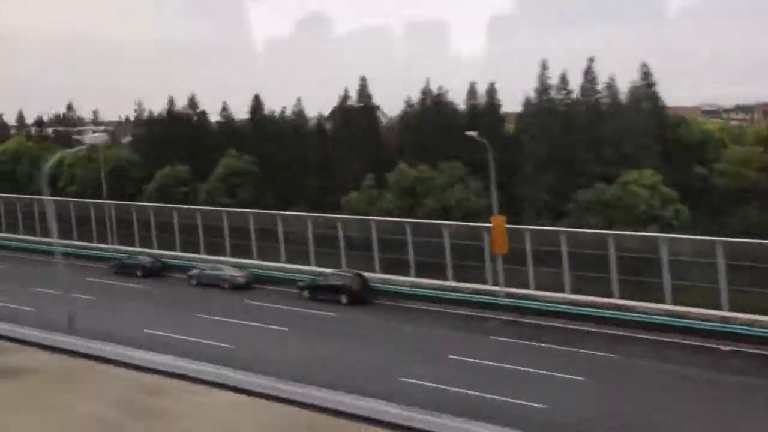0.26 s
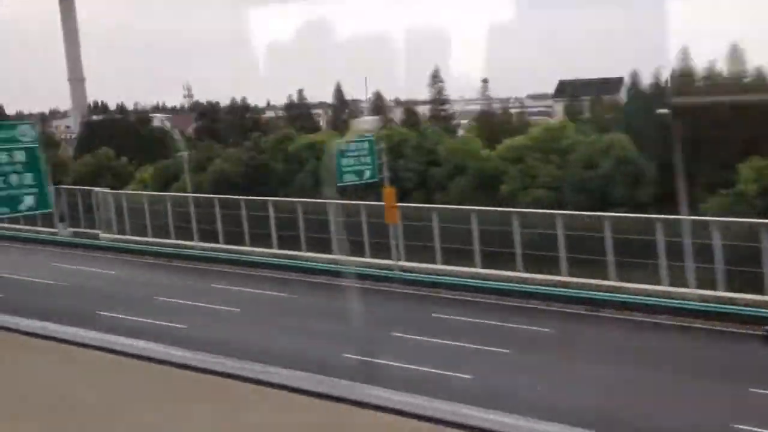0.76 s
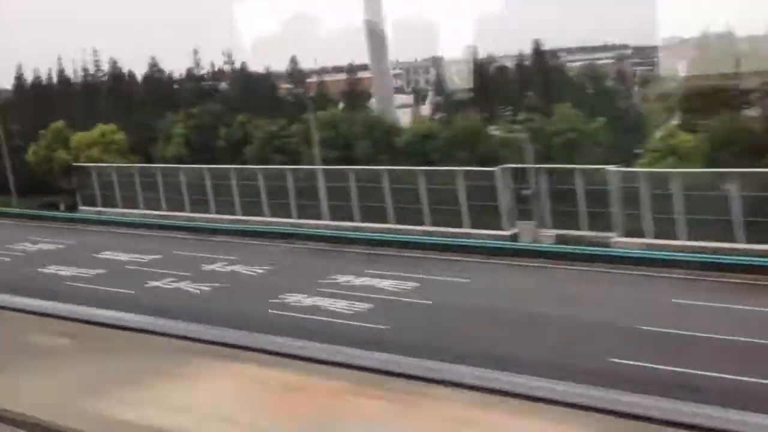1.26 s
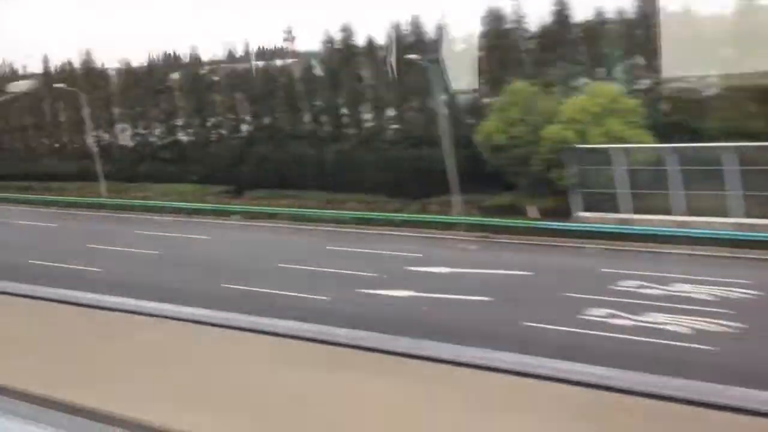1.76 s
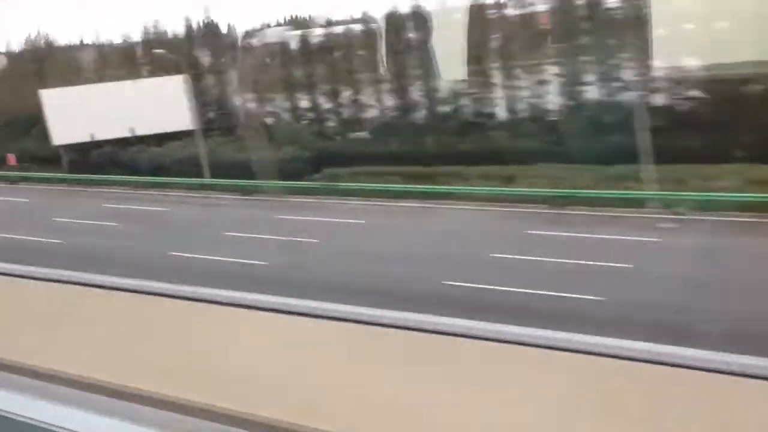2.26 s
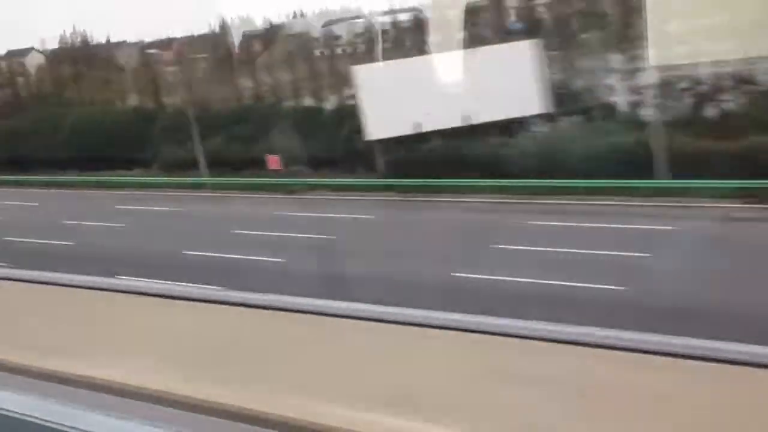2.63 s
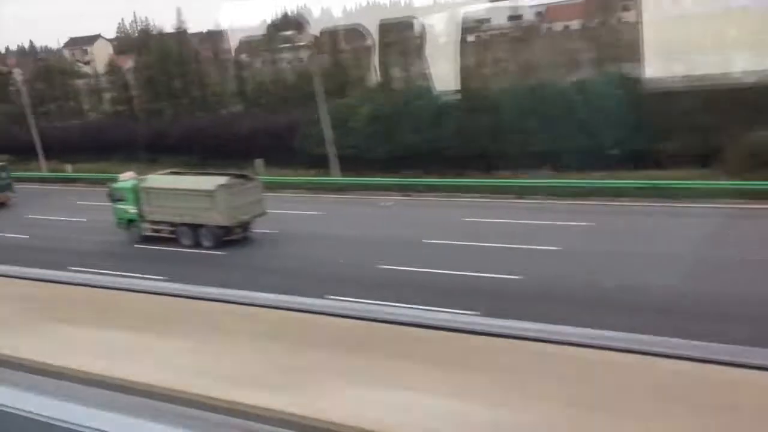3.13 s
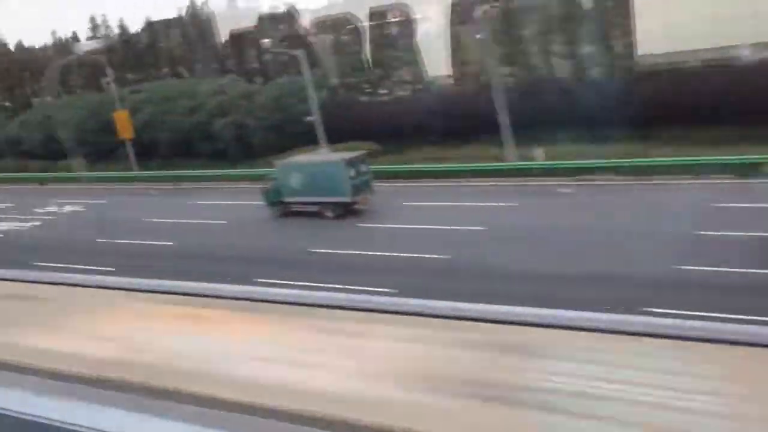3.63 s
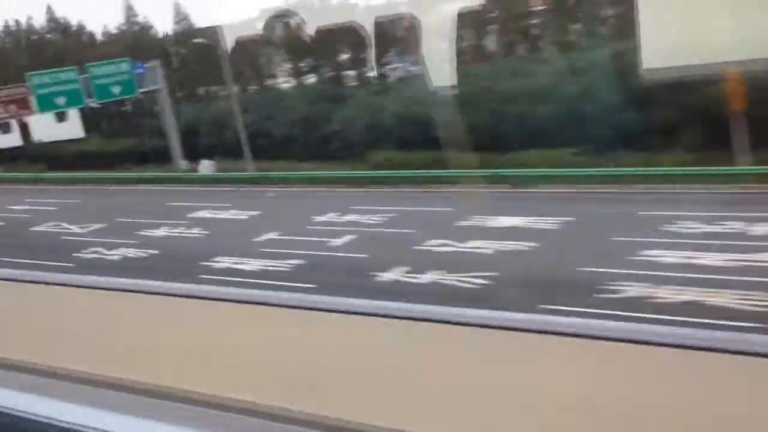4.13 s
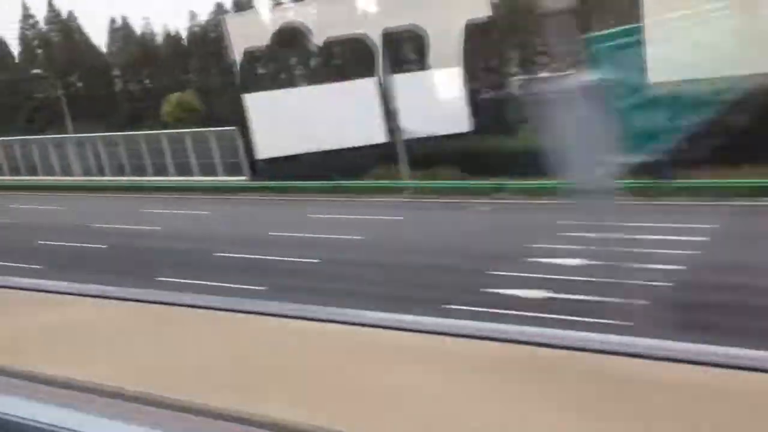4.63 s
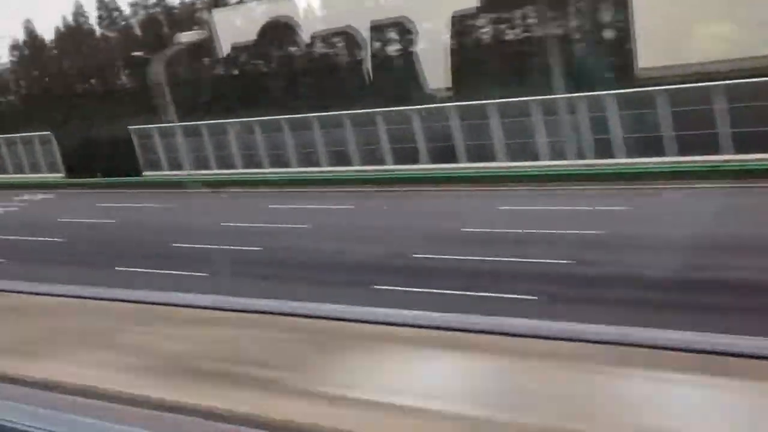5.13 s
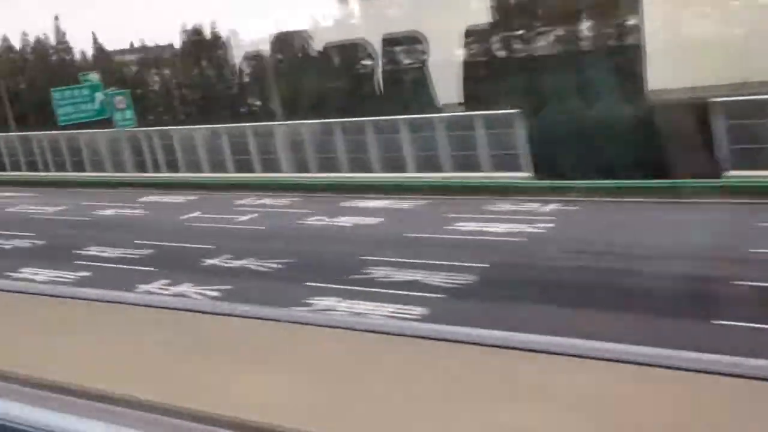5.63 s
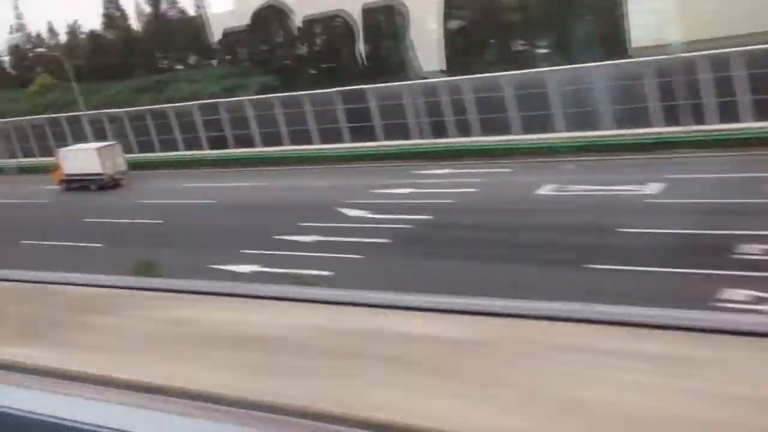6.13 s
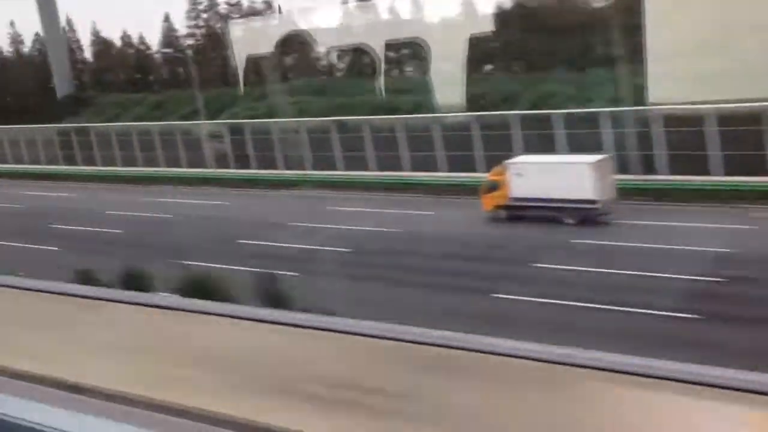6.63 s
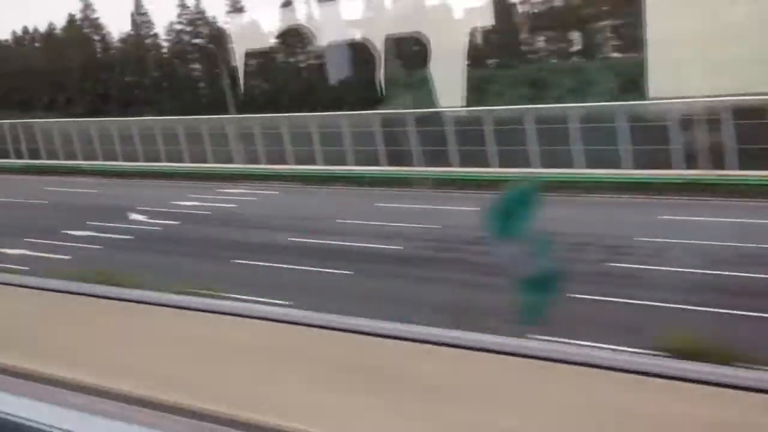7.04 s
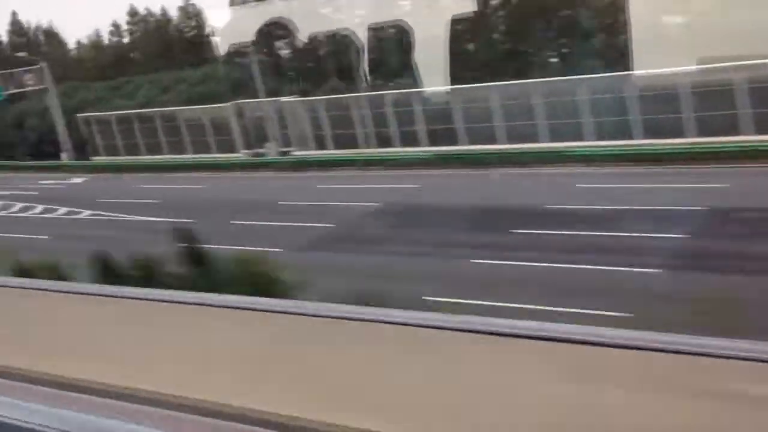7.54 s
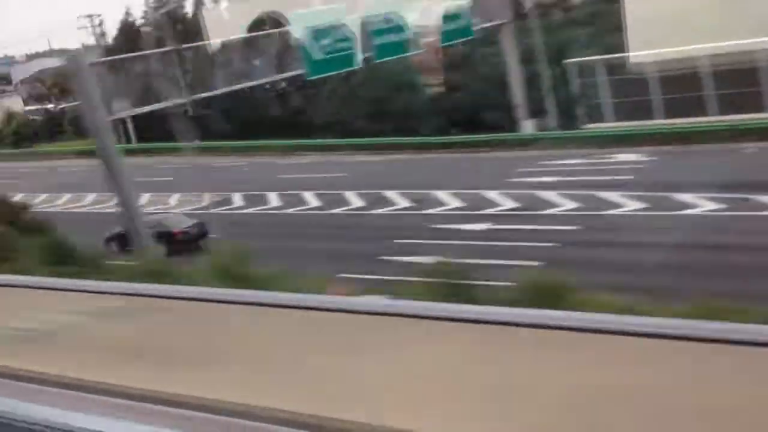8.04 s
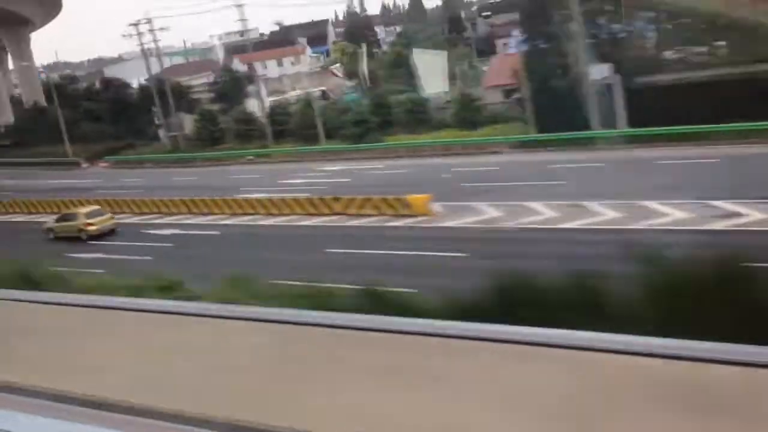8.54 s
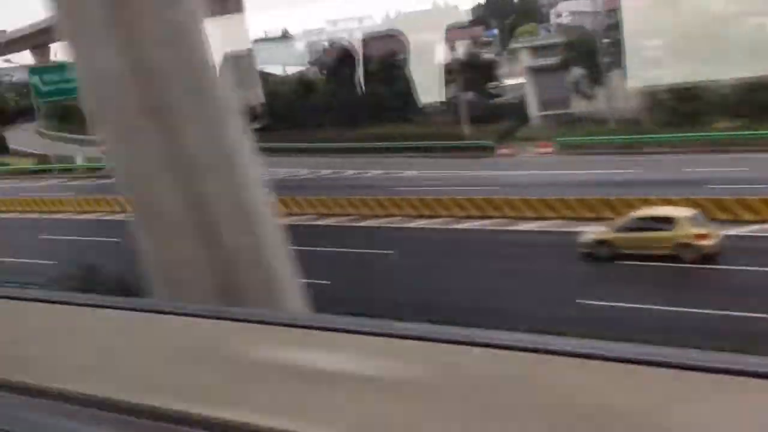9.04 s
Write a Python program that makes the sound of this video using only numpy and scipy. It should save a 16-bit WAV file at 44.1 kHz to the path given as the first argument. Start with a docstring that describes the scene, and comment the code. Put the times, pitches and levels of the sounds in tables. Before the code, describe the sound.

Heard beside a train window, a heavy bass drone shudders unevenly at steady speed, with faint motor hum, muted air hiss and tiny trim ticks.

```python
"""A deep throbbing rumble inside a maglev train at steady speed, heard beside a window.
The guideway shakes the car body: shaped noise throbs at random, with dull thumps and brief lulls.
Filtered noise makes the drone of the walls and the rush of air; one soft band of hiss slides in pitch.
Stator poles and slots pass under the magnets and whine faintly: wavering tones tied to the pole rate.
Trim ticks in short noise bursts; there are faint tonal blips, and soft swishes from sprays of clicks."""
import sys
import numpy as np
from scipy import signal
from scipy.fft import rfft, irfft
from scipy.io import wavfile
from scipy.ndimage import uniform_filter1d

SR = 44100
rng = np.random.default_rng(int(sys.argv[2]) if len(sys.argv) > 2 else 0)


def master(y):
    """Save y as 16-bit WAV."""
    cut = np.clip(np.atleast_2d(y).T, -1, 1)
    pcm = np.round(cut * 32767)  # scale
    wavfile.write(sys.argv[1], SR, pcm.astype(np.int16))


N = 409688
T = np.arange(N) / SR  # time of every sample in seconds


def gain_of(db):
    """Turns dB into a plain multiplier."""
    return 10 ** (np.asarray(db) / 20)


def evened(x):
    """Scales a signal to an average strength (rms) of one."""
    return x / np.sqrt(np.mean(abs(x) ** 2) + 1e-20)


def level(rows, column):
    """Gain over time from one dB column of a curve."""
    rows = np.asarray(rows)
    return gain_of(np.interp(T, rows[:, 0], rows[:, column]))


def add(mix, start_s, sound):
    """Mixes a sound in at a time, cut off where the scene ends."""
    part = mix[round(start_s * SR):][:len(sound)]
    part += sound[:len(part)]


def tint(spectrum, peaks):
    """Level in dB at every frequency: a smooth slope with a few resonances."""
    f = np.fft.rfftfreq(N, 1 / SR)
    hz, db = np.transpose(spectrum)
    colour = np.interp(np.log(f + 1), np.log(hz), db)
    for centre, width, lift in peaks:
        colour = colour + lift / (1 + (2 * (f - centre) / width) ** 2)
    return colour


def noise(spectrum, peaks=(), ripple_db=0):
    """Unit noise with the given colour, a few resonances and the fine ripple of many panel modes."""
    modes = np.arange(0, SR / 2, 16)
    # high modes overlap and even out
    ripple = rng.standard_normal(len(modes)) / (1 + (modes / 3500) ** 4)
    fine = ripple_db * np.interp(np.fft.rfftfreq(N, 1 / SR), modes, ripple)
    colour = tint(spectrum, peaks) + fine
    return evened(irfft(rfft(rng.standard_normal(N)) * gain_of(colour), N))


def wander(rate_hz):
    """Complex unit noise that changes at about the given rate."""
    points_per_s = 400
    hz = np.fft.fftfreq(4096, 1 / points_per_s)
    a, b = rng.standard_normal((2, len(hz)))
    z = np.fft.ifft((a + 1j * b) / (1 + (hz / rate_hz) ** 2))
    return evened(np.interp(T, np.arange(len(z)) / points_per_s, z))


def steadied(x, span_s):
    """Takes the slow chance swells out of a noise and keeps its fast flutter."""
    size = max(int(span_s * SR), 2)
    power = uniform_filter1d(uniform_filter1d(x ** 2, size), size)
    return x / np.sqrt(power + 1e-9)


# Soft swishes, perhaps cloth, and one longer band of hiss near 4 kHz. Each row: start in seconds,
# length in seconds, level in dB before the sound swells and fades, centre in Hz.
SWISHES = [(.3, 0.68, -70.5, 4000), (1.448, 0.73, -80, 8000), (3.155, 0.09, -76, 9000),
           (3.964, 0.07, -63, 4730), (5.106, 0.15, -72, 7000), (6.055, .11, -64, 4780),
           (6.26, .17, -72, 6400), (6.849, .05, -59, 4170), (6.878, .1, -63, 4300), (6.85, .13, -75, 8400),
           (6.9, 0.28, -68, 6700), (8.09, 0.12, -66, 5400), (8.115, 0.075, -71, 9200),
           (9.16, 0.078, -71, 7500)]
# Colour of the tiny clicks. Each row: frequency in Hz, relative level in dB.
CLICK = [(1000, -22), (3000, 10.5), (5000, 5.5), (7500, -5.5), (10000, -4), (15000, -13)]
# Resonances of the clicks. Each row: frequency in Hz, width in Hz, lift in dB.
CLICK_PEAKS = [(4000, 500, 4.5), (6350, 350, 4), (6780, 250, -2.5), (7300, 400, 4.5), (7850, 300, -3),
               (8450, 600, 5), (9600, 400, 3.5)]
# how often the clicks come, and how much they differ
CLICKS_PER_S, CLICK_DB = 700, 4.5


def swishes():
    """Sprays of tiny clicks, like fibres catching, filtered around a centre pitch that differs by row."""
    clicks = (rng.random(N) < CLICKS_PER_S / SR) * rng.choice([-1, 1], N)
    clicks = clicks * gain_of(CLICK_DB * np.minimum(rng.exponential(1, N), 3))
    spray = irfft(rfft(clicks) * gain_of(tint(CLICK, CLICK_PEAKS)), N)
    out = np.zeros(N)
    for start_s, length_s, db, hz in SWISHES:
        size = int(length_s * SR)
        raw = np.roll(spray, -round(start_s * SR))[:size]
        peak = signal.iirpeak(hz, 1.9, fs=SR)
        swish = signal.lfilter(*peak, signal.lfilter(*peak, raw))
        add(out, start_s, gain_of(db) * evened(swish + 0.2 * raw) * np.hanning(size))
    return out


# Brief faint tonal blips, each at its own pitch. Each row: start in seconds, length in seconds,
# level in dB before the blip swells and fades, pitch in Hz.
BLIPS = [(0.245, 0.092, -46.5, 640), (4.078, 0.1, -47, 600), (6.506, .1, -61.5, 1590),
         (6.61, 0.1, -51, 1070)]


def blips():
    """Brief faint tones that waver at random, swell and fade."""
    out = np.zeros(N)
    waver = 1 + .5 * wander(rate_hz=25)
    for start_s, length_s, db, hz in BLIPS:
        size = int(length_s * SR)
        turn = np.exp(2j * np.pi * hz * T[:size])
        blip = (waver[round(start_s * SR):][:size] * turn).real
        add(out, start_s, gain_of(db) * evened(blip) * np.hanning(size))
    return out


# Ticks of the trim. Each row: start in seconds, level in dB before a shared lift,
# time in seconds for the tail to fall by 60 dB.
TICKS = [(.193, -64, .06), (.337, -63, .05), (.543, -64, .09), (.852, -62, .08), (1.618, -63, .14),
         (1.718, -63, .1), (2.168, -63, .12), (2.317, -62, .14), (3.103, -60, .12), (4.439, -62, .06),
         (5.221, -62, .17), (5.315, -58, .13), (5.344, -65, .06), (5.908, -61, .09), (6.089, -61, .15),
         (6.117, -64, .08), (6.175, -67, .05), (6.867, -62, .08), (7.343, -62, .07), (8.127, -65, .08),
         (8.162, -64, .08), (9.195, -66, .09)]
# Colour of a tick. Each row: frequency in Hz, relative level in dB.
TICK = [(600, -22), (2000, -8.5), (4000, 5.5), (7000, -1), (11000, -11.5), (15000, -11.5)]
# the first snap falls by 60 dB in this time; the cabin's answer starts this far under it
CRACK_T60_S, TICK_TAIL_DB = .016, -6


def trim():
    """Small dry ticks, each a snap with a short tail in the padded cabin."""
    out, scatter = np.zeros(N), noise(TICK)
    t = T[:SR // 4]
    for start_s, db, t60_s in TICKS:
        pick = rng.integers(N - len(t))
        snap = gain_of(-60 * t / CRACK_T60_S)
        tail = gain_of(TICK_TAIL_DB - 60 * t / t60_s)
        # 2.3 dB is the shared lift
        add(out, start_s, scatter[pick:pick + len(t)] * gain_of(db + 2.3) * (snap + tail))
    return out


POLE_HZ, PHASES = 80.935, 3  # rate of passing poles, and phases of the winding
# Hum of the stator: the multiples of the pole rate, then the level of each in dB.
HUM_ORDERS = [2, 5, 7, 9, 11, 14, 15, 17, 21, 27, 30, 36, 43, 48]
HUM_DB = [-43.5, -56, -63.5, -64, -67, -68.5, -67, -73, -80, -82, -82, -79.5, -80.5, -85.5]
# The hum at 8 times the pole rate. Each row: time in seconds, level in dB.
HUM_SWELL = [(0, -56.5), (1.2, -59.5), (1.8, -57), (2.3, -61), (4.1, -61.5), (6.5, -63.5), (9.29, -60.5)]
# Tones from the three-phase winding: multiples of a third of the pole rate, then the level of each in dB.
WINDING_ORDERS = [7, 8, 10, 13, 14, 16, 26, 28]
WINDING_DB = [-44, -51, -55, -58.5, -58, -62, -67, -68.5]
# Slot tones: the multiples of the pole rate, then a change in dB for the whole of each tone.
SLOT_ORDERS = [12, 18, 24]
SLOT_DB = [-1.5, 0.1, 0.5]
# The whines at 12, 18 and 24 times the pole rate.
# Each row: time in seconds, level in dB before the change for the whole tone.
WHINE_LOW = [(0.0, -58), (0.14, -50), (0.2, -66), (0.5, -46.5), (0.58, -60), (0.7, -50.0), (0.96, -49),
             (1.06, -52), (1.14, -48), (1.3, -56), (1.44, -47.5), (1.48, -61), (1.68, -53), (2.16, -62),
             (2.56, -57), (3.04, -71), (3.1, -49), (3.3, -61), (3.48, -51), (3.64, -65.0), (3.72, -56),
             (4.24, -64.0), (4.68, -48), (4.84, -64.0), (5.2, -53.0), (5.28, -66.5), (5.44, -53),
             (5.7, -69), (5.78, -53), (6.12, -64), (6.36, -55.0), (6.42, -61), (6.72, -73), (6.82, -54),
             (6.96, -65.0), (7.52, -62), (7.72, -64), (8.04, -50.5), (8.24, -62), (8.3, -55), (8.64, -66),
             (8.68, -53.5), (9.08, -66), (9.28, -53.0)]
WHINE_MID = [(0.0, -67), (0.56, -69), (0.66, -55), (0.88, -68.0), (0.98, -56), (1.06, -72), (1.5, -69.5),
             (1.56, -66), (1.92, -75), (2.24, -60.5), (2.38, -69.5), (2.72, -60.5), (3.08, -68.5),
             (3.16, -61), (3.42, -68), (3.48, -61), (5.18, -71), (5.3, -61), (5.5, -66), (5.68, -60),
             (5.76, -71), (6.22, -63), (6.28, -66), (6.9, -63.0), (7.2, -68), (7.28, -55), (7.36, -70),
             (7.56, -71), (7.6, -57.5), (8.12, -65.0), (8.2, -55), (8.3, -62), (9.02, -63), (9.28, -66)]
WHINE_HIGH = [(0.0, -71.0), (0.16, -72.0), (0.22, -61), (0.62, -66), (0.84, -59), (0.9, -71.5), (2.18, -75),
              (2.26, -61), (2.42, -69), (2.62, -65), (3.32, -74.5), (3.44, -73), (3.74, -64), (3.82, -73.5),
              (4.66, -75), (4.78, -56), (4.84, -76), (4.94, -62), (5.04, -73), (5.32, -62.0), (5.5, -67),
              (5.66, -61.0), (5.74, -73.5), (7.02, -73), (7.1, -63), (7.16, -80), (7.4, -63.5), (8.0, -75),
              (8.04, -65.0), (8.1, -73), (8.32, -64.0), (8.9, -73.5), (8.98, -64), (9.04, -77), (9.22, -78),
              (9.28, -62)]
# Smear of each slot tone. Each row: share of power smeared at first (0 to 1), the same later,
# width of the smear in Hz.
SLOT_SMEAR = [(.3, .72, 11), (.3, .1, 10), (.35, .3, 10)]
# When the smear starts to change and when it is done, in seconds.
SMEAR_CHANGE_S = [1.5, 2.3]
SLOT_STEADY = 0.65  # how far the smear of a slot tone is a waver of pitch and not of level


def motor():
    """Multiples of the pole rate; the many magnets beat against each other and smear the tones."""
    pole_hz = POLE_HZ + 0.049 * wander(rate_hz=0.67).real
    phase = 2 * np.pi * np.cumsum(pole_hz) / SR

    def tone(order, smear, width_hz, steady=0):
        """A unit tone: one pure part and one that wavers at random."""
        smear = np.clip(smear, 0, 1)
        beat = np.sqrt(1 - smear) + np.sqrt(smear) * wander(rate_hz=width_hz)
        beat = evened(beat / (abs(beat) + .1) ** steady)
        turn = np.exp(1j * (order * phase + 2 * np.pi * rng.random()))
        return np.sqrt(2) * (beat * turn).real

    out = level(HUM_SWELL, column=1) * tone(order=8, smear=0.54, width_hz=4.0)
    for order, db in zip(HUM_ORDERS, HUM_DB):
        out += gain_of(db) * tone(order, smear=0.55, width_hz=1.6)
    for order, db in zip(WINDING_ORDERS, WINDING_DB):
        out += gain_of(db) * tone(order / PHASES, smear=0.37, width_hz=1.6)
    whines = (WHINE_LOW, WHINE_MID, WHINE_HIGH)
    for order, curve, db, (first, later, width_hz) in zip(SLOT_ORDERS, whines, SLOT_DB, SLOT_SMEAR):
        smear = np.interp(T, SMEAR_CHANGE_S, (first, later))
        whine = tone(order, smear, width_hz, SLOT_STEADY)
        out += gain_of(db) * level(curve, column=1) * whine
    return out


# A narrow band of hiss that drifts and comes and goes.
# Each row: time in seconds, centre in Hz, level in dB before a shared cut.
HISS_BAND = [(0,3200,-73), (.9,3250,-64.5), (1.25,3370,-66), (1.6,3290,-67), (2,3140,-69.5), (2.9,3385,-70),
             (3.35,3460,-67), (3.6,3480,-67), (4.3,3480,-67.5), (5,3450,-68), (5.35,3330,-63),
             (5.601,3300,-67.5), (5.85,3480,-63), (6.15,3450,-68), (6.45,3510,-77), (6.95,3510,-80),
             (7.2,3400,-61), (7.6,3476,-66.5), (8.6,3475,-68.5), (9.29,3470,-67.5)]
HISS_WIDTH_HZ = 330


def hiss_band():
    """Air noise in one soft resonance that slides slowly up and down."""
    s, hz, _ = np.transpose(HISS_BAND)
    a, b = rng.standard_normal((2, N))
    narrow = signal.lfilter(*signal.butter(2, HISS_WIDTH_HZ / 2, fs=SR), a + 1j * b)
    # turning the slow noise moves it up to the sliding centre
    turn = np.exp(2j * np.pi * np.cumsum(np.interp(T, s, hz)) / SR)
    return gain_of(-2.3) * evened((narrow * turn).real) * level(HISS_BAND, column=2)


EDDY_TOP_HZ = 4200  # well above this the eddies are too small to hear one by one, and the hiss is even
THREAD_DB = 1.3  # strength of the longer threads


def turbulent(x, patchy_db):
    """Eddies lift and drop narrow bands of a noise for a tenth of a second; threads last half a second."""
    hz, _, z = signal.stft(x, SR, nperseg=1024, noverlap=768)

    def patches(size, top_hz):
        """Random patches over time and pitch, fading out above a top frequency."""
        field = uniform_filter1d(rng.standard_normal(z.shape), size=3, axis=0)
        return evened(uniform_filter1d(field, size=size, axis=1)) / (1 + (hz[:, None] / top_hz) ** 4)

    eddies = patchy_db * patches(size=20, top_hz=EDDY_TOP_HZ)
    threads = THREAD_DB * patches(size=80, top_hz=8000)
    _, uneven = signal.istft(z * gain_of(eddies + threads), nperseg=1024, noverlap=768)
    return evened(uneven[:N])


# Brief changes of the rumble, mostly dips. Each row: time in seconds, change in dB of the floor's heave,
# change in dB of the panels' boom.
LULLS = [(.16, -6, -4), (.25, -3, -0.5), (.31, 6, -2), (.61, -5, -1.5), (1.05, -9, -1), (1.38, -5.5, -6.5),
         (1.72, -2, -4), (2.2, -3.5, -8.5), (2.32, -5, -4), (2.44, -18, -3), (2.77, -7, -13),
         (3.13, -7, -1.5), (3.32, -6, -2), (3.44, -6, -2.5), (3.8, -3, -1.5), (3.87, -4, -1.5),
         (4.1, -7, -5), (4.42, -2.5, -4.5), (5.07, -3, -6), (5.28, -7.5, 3.5), (5.73, -5, 1),
         (6.22, -4, -0.5), (6.48, -1, 0.5), (6.62, -5, -6), (6.78, -5, -7), (7.03, -2, 1.5),
         (7.56, -1, -1.5), (7.97, -9, -1), (8.38, -1, -6), (8.6, -8, -3.5), (9.22, -2.5, -13)]
LULL_S = .04  # half length of a lull


def lulls(column):
    """Changes in dB over time: mostly dips, where the ride is briefly smoother."""
    total = 0
    for row in LULLS:
        total = total + row[column] * np.exp(-np.minimum(((T - row[0]) / LULL_S) ** 2, 20))
    return total


# The steady ride, played by the shell and the rumble. Each row: time in seconds, then levels in dB,
# before each layer's small fixed change, of the floor's heave, panels' boom, walls' drone and air rush.
RIDE = [(0,-18.5,-17.5,-28.5,-49.5), (0.25,-26,-23.5,-31.5,-50.5), (0.6,-26.5,-22,-29,-49.5),
        (1.2,-22.5,-21.5,-29.5,-50), (1.75,-22,-23.5,-29.5,-49.5), (2.3,-22,-24.5,-32.5,-52),
        (3,-25,-20,-29.5,-51), (3.6,-20.5,-25.5,-30.5,-51), (4.1,-21,-20,-29.5,-50.5),
        (4.7,-21.5,-27.5,-30,-50.5), (5.3,-23,-20.5,-29.5,-50), (5.8,-24.5,-22.5,-27.5,-50),
        (6.5,-23,-20.5,-30,-50.5), (7.2,-23.5,-24,-30,-51), (8,-23,-22.5,-30,-50.5),
        (8.8,-23.5,-21,-29.5,-50.5), (9.29,-20,-23,-28.5,-49.5)]
# Colours of the drone and the rush. Each row: frequency in Hz, relative level in dB.
DRONE = [(100, -26), (150, 3), (185, -2.5), (220, -5), (250, -12), (275, -11), (345, -14.5), (410, -21.5),
         (510, -22.5), (640, -23), (710, -31), (860, -34), (1200, -39.5), (4000, -93)]
RUSH = [(200, -19.5), (700, -2), (1020, 4.5), (1130, -2.5), (1430, 0), (1600, -5.5), (2050, -7.5),
        (2450, -9.5), (2900, -9.5), (3400, -11), (4500, -18), (7000, -27), (10000, -32.5), (15000, -35)]
# Resonances of the window and its frame. Each row: frequency in Hz, width in Hz, lift in dB.
PANE = [(1360, 160, 0.3), (2440, 130, 3), (3150, 100, 0), (3450, 330, -2.5), (5600, 250, 1),
        (6850, 500, 1.5)]
DRONE_LULL = 0.16  # share of each change in the boom that reaches the walls


def shell():
    """The walls drone below the rush of air along the outside."""
    drone = steadied(noise(DRONE, ripple_db=0.73), span_s=0.13) * level(RIDE, column=3)
    drone = drone * gain_of(DRONE_LULL * lulls(column=2))
    rush = turbulent(noise(RUSH, PANE), patchy_db=1.5) * level(RIDE, column=4)
    return gain_of(0.36) * drone + gain_of(0.78) * rush


# Colours of the floor's heave, the panels' boom and the car's sway.
# Each row: frequency in Hz, relative level in dB.
HEAVE = [(15, -57.5), (32, -31.5), (42, -17.5), (51, 2), (62, 4.5), (80, -1.5), (92, -6), (110, -15),
         (200, -56), (500, -90)]
BOOM = [(30, -50.5), (70, -13), (90, -5), (105, -0.5), (130, -1.5), (150, -6.5), (170, -18.5), (220, -27),
        (400, -56.5), (1200, -99)]
SWAY = [(8, -31), (22, -16), (32, -11), (42, -5), (52, -1), (85, -7), (130, -18), (400, -70)]
# The body's strongest low resonances. Each row: frequency in Hz, width in Hz, lift in dB.
BODY_MODES = [(82, 30, 3), (106, 2.1, 4)]
THROB_HZ = 4.8  # the whole car body throbs together at random, at about this rate


def rumble():
    """Uneven girders heave the floor and set the big panels booming, over the slow sway of the car."""
    throb = evened(wander(rate_hz=THROB_HZ).real)  # in dB
    heave = steadied(noise(HEAVE, BODY_MODES), span_s=0.07)
    heave = heave * level(RIDE, column=1) * gain_of(-1.5 + throb)
    boom = steadied(noise(BOOM, BODY_MODES), span_s=.05)
    boom = boom * level(RIDE, column=2) * gain_of(-1.43 + throb)
    sway = steadied(noise(SWAY), span_s=0.1) * gain_of(-39.5 + throb)
    return (heave + sway) * gain_of(lulls(column=1)) + boom * gain_of(lulls(column=2))


# The hardest jolts from the guideway. Each row: time in seconds, peak in dB before a shared cut,
# pitch of the thump in Hz, length in seconds.
JOLTS = [(0.017,-8.5,79,0.012), (0.378,-9.5,80,0.018), (0.48,-6.5,133,0.0072), (0.723,-11.5,84,0.016),
         (0.856,-7.5,108,0.0084), (0.971,-11.5,83,0.015), (1.14,-8.5,101,0.011), (1.533,-15,89,0.019),
         (1.95,-7.5,93,0.0056), (2.036,-5.5,98,0.011), (2.369,-10,100,.010), (2.536,-14,95.7,0.042),
         (2.572,-10.5,85,0.015), (2.641,-9,94.7,0.0077), (3.025,-8.5,71.6,0.012), (3.246,-10.5,84,0.016),
         (3.387,-9.5,101,0.0077), (3.554,-8.5,97,0.012), (3.767,-9.5,79.3,0.014), (4.032,-12,137.5,0.021),
         (4.25,-7.5,105,0.012), (4.558,-9.5,120,0.021), (4.656,-8,105,0.0071), (4.711,-8,89,0.013),
         (4.819,-10,80,0.017), (4.845,-12.5,63,0.039), (4.993,-5,68,0.011), (5.175,-7.5,65,0.025),
         (5.345,-13,82,0.0093), (5.518,-6.5,95,0.011), (6.002,-6.5,97,0.011), (6.04,-12.5,100,0.015),
         (6.092,-9.5,101,0.016), (6.135,-8,104,0.011), (6.395,-5,81.5,0.017), (6.5,-16.5,125,.02),
         (6.68,-15,130,.018), (6.718,-8.5,86,0.013), (6.829,-8.5,66.5,0.022), (6.86,-10,107,0.013),
         (6.925,-12,119,0.022), (6.963,-10.5,91,0.034), (7.349,-5.5,85,0.0067), (7.488,-6,73,0.015),
         (7.867,-4.5,97,0.011), (8.313,-7.5,120.6,0.0064), (8.529,-13.5,90,0.032), (8.719,-11,96.5,0.015),
         (8.849,-9,103,0.011), (8.919,-4.5,73,0.0089), (8.996,-8.5,112.4,0.0093), (9.142,-8.5,122,0.011)]
JOLT_RISE, JOLT_FALL = 0.57, 0.62  # swell and decay of a thump, as shares of its length
JOLT_TAKEOVER = 0.71  # share of the body's random shaking that a jolt overrides at its peak


def jolted(shaking):
    """Each bump in the guideway takes over the body's shaking with one dull, heavily damped thump."""
    thumps, free = np.zeros(N), np.ones(N)
    for peak_s, db, hz, length_s in JOLTS:
        near = abs(T - peak_s) < 4 * length_s
        since = T[near] - peak_s
        span = length_s * np.where(since < 0, JOLT_RISE, JOLT_FALL)
        swell = np.exp(-(since / span) ** 2)
        thumps[near] += gain_of(db) * swell * np.cos(2 * np.pi * (hz * since + rng.random()))
        free[near] *= 1 - np.clip(JOLT_TAKEOVER, 0, 1) * swell
    return free * shaking + gain_of(-0.5) * thumps


def scene():
    """Everything as heard at the window seat, in one channel."""
    body = jolted(rumble())
    small_sounds = trim() + blips() + swishes()
    return (body + shell() + hiss_band() + motor() + small_sounds)[None]


EDGE_HZ = 15300  # sound above this is cut away


def record(dry):
    """A brief fade at both ends and a steep cut of the highest treble."""
    fade = np.clip(np.minimum(T, T[-1] - T) / .006, 0, 1)
    low_pass = signal.firwin(511, EDGE_HZ, window=("kaiser", 9), fs=SR)
    return signal.oaconvolve(dry * fade, low_pass[None], "same")


dry = scene()
out = record(dry)
master(out)
```